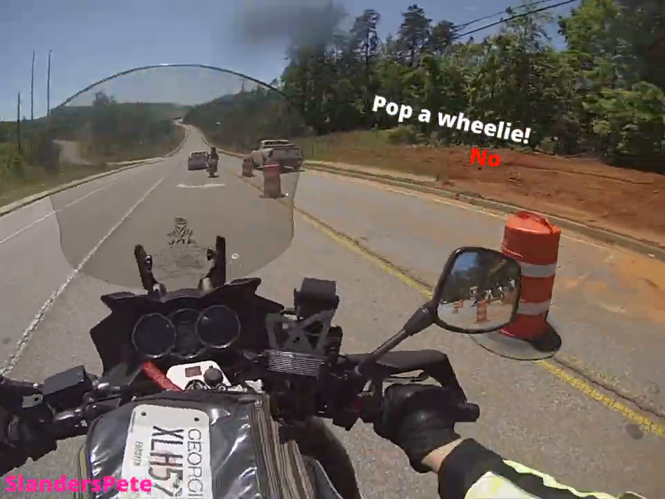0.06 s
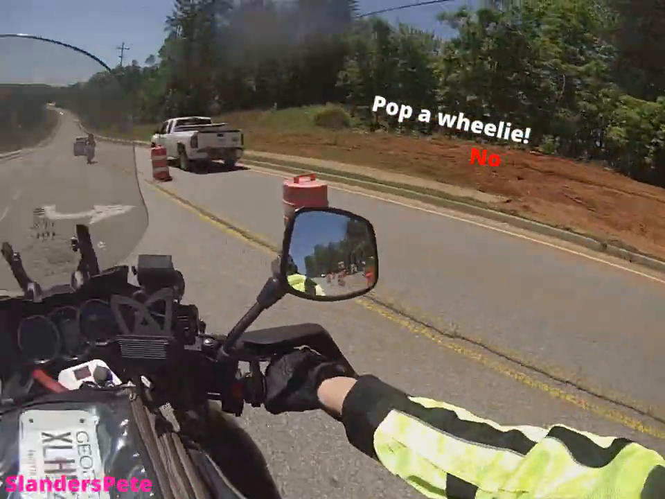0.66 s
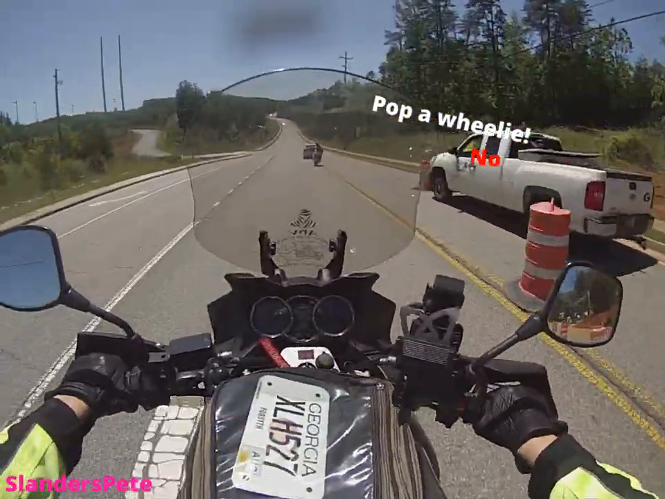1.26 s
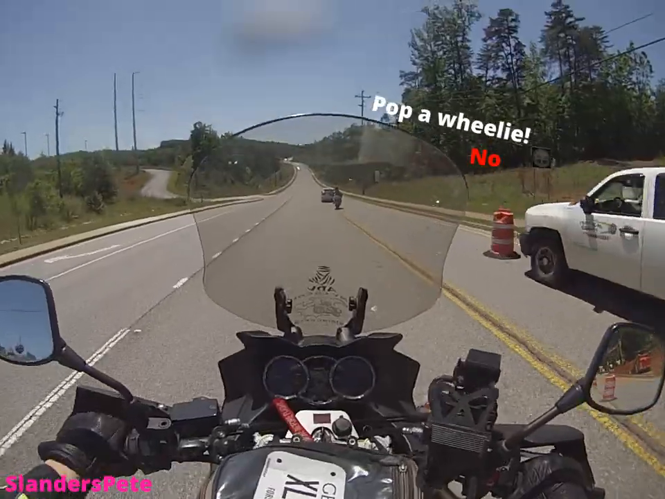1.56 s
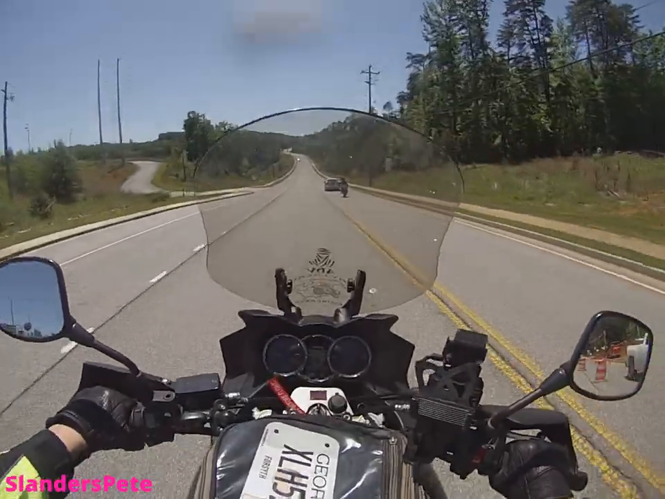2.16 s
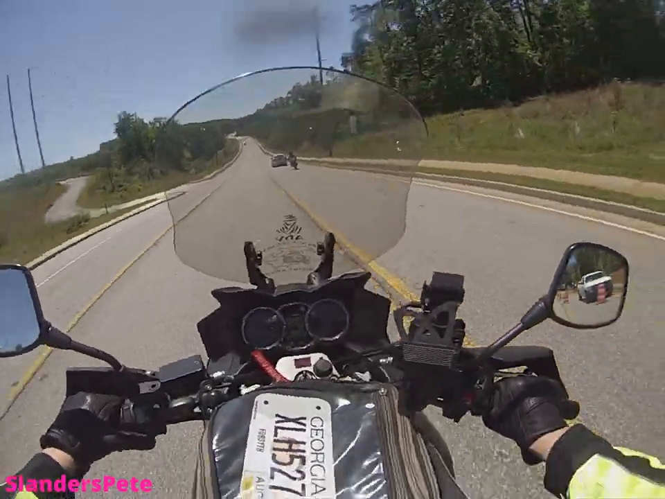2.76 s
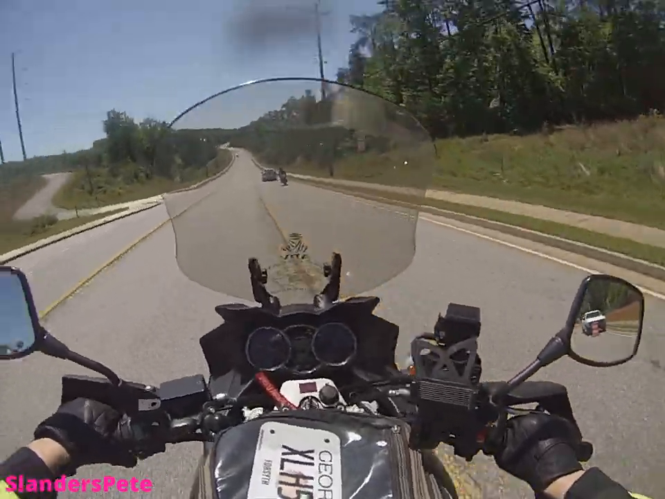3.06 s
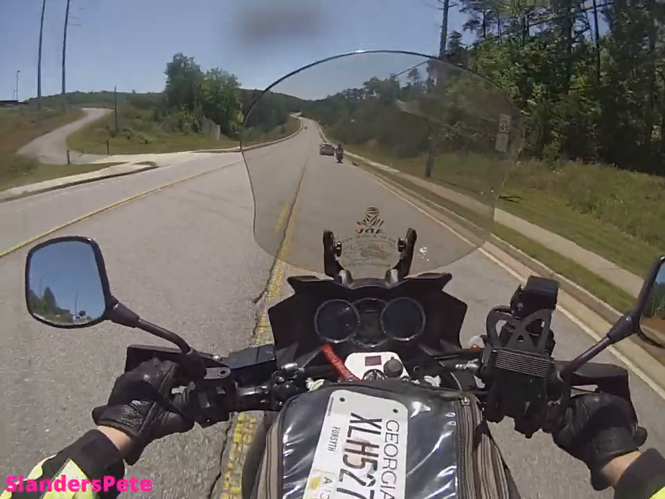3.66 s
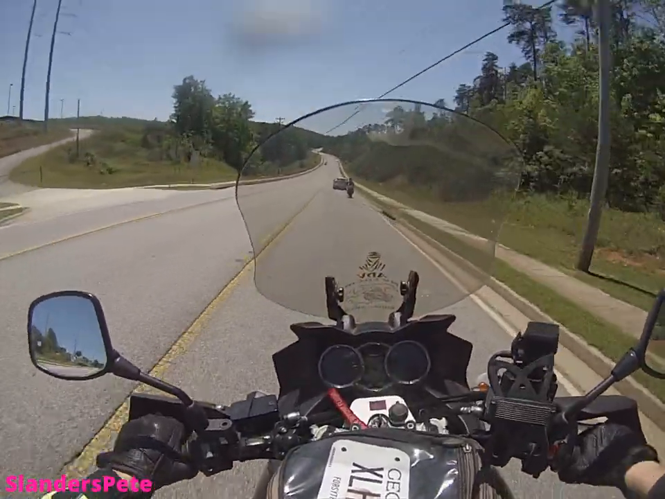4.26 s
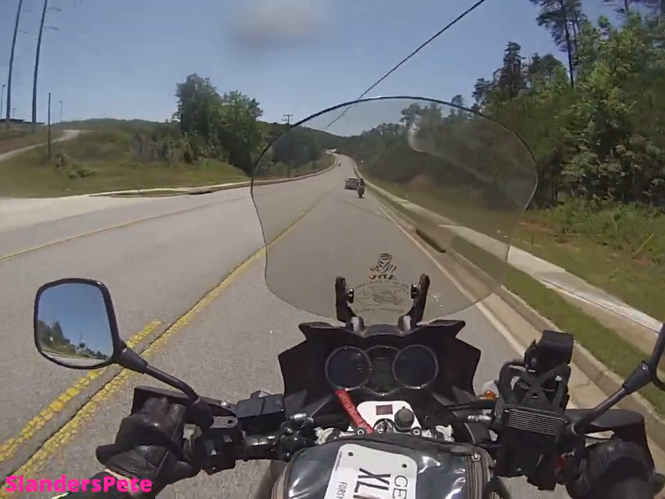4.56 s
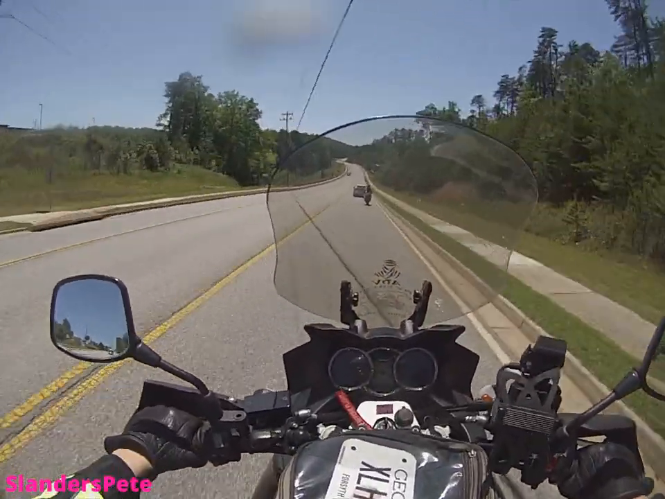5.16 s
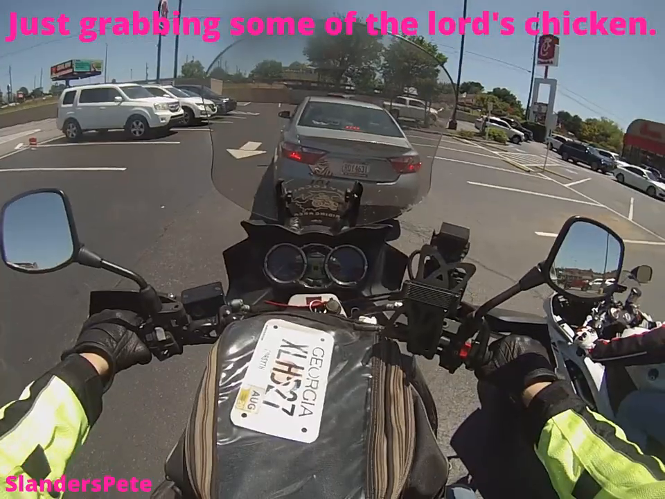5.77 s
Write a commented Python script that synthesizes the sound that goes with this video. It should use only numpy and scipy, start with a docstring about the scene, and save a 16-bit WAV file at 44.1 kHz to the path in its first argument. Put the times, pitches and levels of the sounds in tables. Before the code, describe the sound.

A twin-cylinder motorcycle rides along an open road, heard from the rider's helmet, with wind rumbling and slapping at the microphone over a low hum. Three quick pulls on the throttle raise the revs, which fall for a gear change. The engine then climbs steadily with faint gear whine and eases off again. Near the end the sound cuts to the same bike idling in a car park, throbbing and ticking.

```python
"""On the open road, microphone at the rider's helmet, a twin-cylinder motorcycle just below it. Wind buffets
the microphone over a low hum. Three short pulls on the throttle, the revs fall for a gear change, then the
machine pulls away in a higher gear: firings ring the pipe, air rasps in the airbox, gears whine and the valve
gear rattles. After 5.4 s the scene jumps to a car park, where an idle throbs lumpily, with ticking tappets."""
import sys
import numpy as np
from scipy import signal
from scipy.fft import rfft, irfft, next_fast_len
from scipy.io import wavfile

SR = 44100
rng = np.random.default_rng(int(sys.argv[2]) if len(sys.argv) > 2 else 0)


def store_wav(level_fs):
    """Save 16-bit WAV to argv[1]."""
    pcm = np.round(np.clip(np.atleast_2d(level_fs), -1, 1) * 32767)
    wavfile.write(sys.argv[1], SR, pcm.T.astype(np.int16))


N = 261027
T = np.arange(N) / SR
CAR_PARK_S = 5.402


def undb(db):
    """Decibels to gain."""
    return 10 ** (np.asarray(db) / 20)


def unit(x):
    """Scale to rms 1."""
    return x / np.sqrt(np.mean(x ** 2))


def curves(table):
    """The columns of a table, joined by straight lines in time."""
    times, *columns = np.transpose(table)
    return [np.interp(T, times, column) for column in columns]


def noise():
    """White noise."""
    return rng.standard_normal(N)


def walk(rate):
    """Smooth random drift of rms 1 that changes about rate times a second."""
    hz = np.arange(N // 2 + 1) * SR / N
    return unit(irfft(rfft(noise()) / (1 + (hz / rate) ** 4), N))


def colour(x, points):
    """Causal filter with a (Hz, dB) response that falls away above its last point; output at rms 1."""
    hz, db = np.transpose(points)
    size = next_fast_len(N + SR // 2, True)
    f = np.maximum(np.arange(size // 2 + 1) * SR / size, 1)
    gain = undb(np.interp(np.log(f), np.log(hz), db)) / np.maximum(f / hz[-1], 1) ** 4
    cepstrum = irfft(np.log(gain), size)
    cepstrum[1:size // 2] *= 2  # fold for minimum phase
    cepstrum[size // 2 + 1:] = 0
    return unit(irfft(rfft(x, size) * np.exp(rfft(cepstrum, size)), size)[:N])


def ring(x, hz, width):
    """One resonance, gain 1 at its centre."""
    return signal.lfilter(*signal.iirpeak(hz, hz / width, SR), x)


def band(x, hz, width):
    """The same resonance twice over; output at rms 1."""
    return unit(ring(ring(x, hz, width), hz, width))


def swell(at, half):
    """A bell-shaped rise and fall around a moment."""
    return np.exp(-((T - at) / half) ** 2 / 2)


def tone(turns, rough):
    """A sine locked to a rotation, wavering in strength."""
    return np.sqrt(2) * np.sin(2 * np.pi * turns) * (1 + rough * walk(21))


def strokes(turns, scatter_db):
    """One pulse of uneven strength at each whole turn."""
    return np.diff(np.floor(turns), prepend=np.floor(turns[0])) * undb(scatter_db * noise())


def puffs(turns, decay, depth):
    """An envelope that jumps at each whole turn and dies back; decay is in turns."""
    return unit(1 + depth * np.exp(-(turns % 1) / decay))


# Faint ticks during the ride: (time [s], level [dB])
TREBLE_TICKS = [(1.994, -49), (2.134, -42), (2.363, -48), (2.497, -47), (2.674, -45), (2.925, -46),
                (3.572, -46)]


def ticks():
    """Small sharp ticks high in the treble."""
    bursts = sum(undb(db) * (T >= at) * np.exp(-np.abs(T - at) / .002) for at, db in TREBLE_TICKS)
    return bursts * band(noise(), hz=11800, width=3500)


# Small sounds in both places: (time [s], centre [Hz], width [Hz], half length [s], level [dB])
SQUEAK_BANDS = [(0.03, 2290, 200, 0.082, -40), (0.656, 4270, 2200, 0.44, -45.5),
                (1.03, 3103, 129.9, 0.065, -45.5), (1.39, 3566, 600, 0.0082, -42),
                (1.681, 1720, 110, 0.091, -44.5), (1.995, 2310, 130, 0.14, -42.5),
                (4.381, 7440, 110, 0.0093, -41), (4.632, 7200, 600, .005, -51),
                (4.78, 5020, 3000, .018, -40), (5.654, 8000, 300, 0.0061, -58),
                (5.655, 5500, 3000, .009, -46)]


def squeaks():
    """Brief thin rings, squeaks and rustles."""
    return sum(undb(db) * swell(at, half) * band(noise(), hz, width)
               for at, hz, width, half, db in SQUEAK_BANDS)


# A low hum on the road, heard at the helmet: (time [s], pitch [Hz], level [dB])
LOW_HUM = [(0, 203, -16), (.15, 212, -17), (.35, 211, -30), (.5, 209.2, -20), (.75, 221, -19.5),
           (1.05, 232.4, -21.5), (1.5, 243, -21), (1.85, 250.2, -28), (2.35, 260.8, -33), (2.7, 270, -25),
           (4.3, 232, -38), (4.5, 230, -28), (5, 233, -26.5), (5.35, 258, -27)]


def hum():
    """A wavering low hum, from tyres or wind, climbs slowly, fades, then returns lower and climbs again."""
    hz, db = curves(LOW_HUM)
    cycles = np.cumsum(hz + 2 * walk(12.2)) / SR
    octave = undb(-11) * tone(2 * cycles, rough=.5)
    return undb(db) * (tone(cycles, rough=.22) + octave)


# Air stream at the helmet, relative levels: (time [s], rumble [dB], buffeting [dB], hiss [dB])
AIR_STREAM = [(0, -15, -21.5, -40), (.45, -25, -22, -43.5), (.62, -25, -20, -42.5), (.75, -30, -24.5, -41),
              (1.05, -29, -24.5, -46), (1.2, -21, -25, -51), (1.68, -20, -24, -46.5),
              (1.9, -17, -19.5, -41.5), (2.25, -18.5, -16, -40), (2.33, -13.5, -20.5, -47),
              (2.5, -21, -22.5, -44.5), (2.8, -24, -19, -42.5), (3.35, -15, -16.5, -42.5),
              (3.9, -18.5, -20.5, -43), (4.2, -21.5, -18.5, -41), (4.6, -17, -20, -44.5),
              (4.9, -16, -18, -42), (5.4, -21, -19.5, -43)]
# Single slaps right on the microphone: (time [s], half length [s], buffeting [dB], rumble [dB])
WIND_SLAPS = [(.065, 0.01, -14, -13), (0.157, 0.02, -18, -20), (0.537, 0.01, -21, -18),
              (1.188, 0.046, -23.5, -17.5), (1.447, 0.064, -21, -15), (1.791, 0.0076, -21, -11),
              (1.84, 0.014, -16, -13), (1.906, 0.0073, -15.5, -12), (1.983, 0.011, -14.5, -11.5),
              (2.088, 0.016, -16, -9), (2.292, 0.014, -12, -6.5), (2.362, .01, -22, -9),
              (2.493, .008, -21, -13), (3.547, 0.057, -19, -16.5), (4.221, 0.018, -14.5, -15),
              (5.12, 0.014, -12.5, -26), (5.151, 0.0095, -33, -13.5), (5.261, 0.0065, -16, -16),
              (5.376, 0.023, -16, -18)]
# Spectra of the three wind layers: (frequency [Hz], gain [dB])
RUMBLE_SPECTRUM = [(12, -5), (25, -2), (45, -1), (85, -4.5), (130, -3.5), (190, -10), (280, -13.5),
                   (500, -56)]
BUFFET_SPECTRUM = [(90, -21.5), (170, 0.5), (250, 2.5), (320, 0), (400, 1.5), (480, -1), (620, -1.5),
                   (750, -6), (880, -11.5), (1050, -20), (1400, -29), (2500, -62.5)]
HISS_SPECTRUM = [(900, 0.5), (1500, 7.5), (3200, 7), (4300, -0.5), (5200, 2), (5700, 0.5), (6400, 3),
                 (7100, -6.5), (7700, -5.5), (8500, -12.5), (10500, -16.5), (13000, -22)]


def wind():
    """Eddies slap the microphone in quick gusts above a low rumble; air hisses, more under throttle."""
    rumble_db, buffet_db, hiss_db = curves(AIR_STREAM)
    load, _ = throttle()
    eddies, gusts_db = walk(39), 1.03 * walk(17)
    slaps = sum(undb(db) * swell(at, half) for at, half, db, _ in WIND_SLAPS)
    thumps = sum(undb(db) * swell(at, half) for at, half, _, db in WIND_SLAPS)
    rumble = np.hypot(undb(rumble_db + gusts_db - .5), thumps) * colour(noise(), RUMBLE_SPECTRUM)
    turbulence = unit(colour(noise(), BUFFET_SPECTRUM) * undb(.56 * eddies))
    buffet = np.hypot(undb(buffet_db + gusts_db), slaps) * turbulence
    hiss = undb(hiss_db + 4.5 + 3.2 * load + .95 * eddies) * colour(noise(), HISS_SPECTRUM)
    return rumble + buffet + hiss


# Idle harmonics in the car park, relative levels: (time [s], first [dB], second [dB], third [dB])
THROB_HARMONICS = [(5.41, -15, -15.5, -20), (5.51, -20, -13, -12.5), (5.555, -22, -28, -31),
                   (5.614, -18, -12.5, -12.5), (5.73, -23, -42, -15.5), (5.765, -19, -11.5, -34),
                   (5.92, -17, -31, -9.5)]
# Spectra of the idle's gas puffs, tappets and thuds: (frequency [Hz], gain [dB])
GAS_SPECTRUM = [(110, -2.5), (190, 2), (270, 1.5), (340, -5.5), (420, -2.5), (520, -5), (610, -6),
                (700, -2), (780, -14), (930, -15), (1100, -30), (1500, -62)]
TAPPET_SPECTRUM = [(800, -16), (1300, -5.5), (1560, -7.5), (1820, 0), (2250, -7.5), (2850, -4), (3600, -10),
                   (4400, -17.5), (5300, -17), (6300, -20.5), (7300, -26.5), (8600, -32.5), (10500, -33),
                   (13000, -43)]
THUD_SPECTRUM = [(20, -41), (60, -24), (140, 19.5), (200, -5.5), (280, -5), (400, -28.5)]
IDLE_HZ, IDLE_SAG_HZ_PER_S = 45, 2.6


def idle():
    """A lumpy throb that slowly sinks, with a thud, a gas puff and tappet noise on every beat."""
    hz = IDLE_HZ - IDLE_SAG_HZ_PER_S * (T - CAR_PARK_S)
    beats = np.cumsum(hz * (T > CAR_PARK_S)) / SR + .6
    # the pipe shifts each harmonic a little more, so a beat swings up and then down
    throb = sum(undb(db - .3) * tone(harmonic * (beats - .2) + .5, rough=.15)
                for harmonic, db in enumerate(curves(THROB_HARMONICS), 1))
    thuds = undb(-29) * colour(strokes(beats, scatter_db=2.5), THUD_SPECTRUM)
    gas = noise() * puffs(beats, decay=.18, depth=1.4) * undb(.8 * walk(5.1))
    body = undb(-24) * colour(gas, GAS_SPECTRUM)
    tappets = undb(-39.5) * colour(noise() * puffs(beats, decay=.22, depth=.55), TAPPET_SPECTRUM)
    return throb + thuds + body + tappets


# Gearbox, heard from the saddle: (order [per crank turn], peak time [s], half length [s], level [dB])
GEAR_WHINES = [(33.2, 3.03, 0.26, -37), (63, 0.68, 0.1, -47), (80.8, 1.24, 0.12, -51),
               (81.3, 2.86, 0.13, -48), (67.5, 4.1, 0.36, -47), (45.7, 4.12, 0.087, -44)]


def gears(turns):
    """Gear whines come and go, their pitch tied to the crank."""
    return sum(undb(db) * swell(at, half) * tone(order * (turns + .0029 * walk(30)), rough=.29)
               for order, at, half, db in GEAR_WHINES)


# Resonances of the engine cases: (centre [Hz], width [Hz], gain [dB])
CASE_MODES = [(1302, 41, 8.5), (1763, 44, 7.5), (2210, 270, 6), (2950, 130, 1), (3850, 59, -0.5)]


def valve_gear(turns, load):
    """The valve gear rattles in the cases twice a turn, harder under load."""
    rattle = noise() * puffs(2 * turns, decay=.11, depth=1.9)
    cases = unit(sum(undb(db) * ring(rattle, hz, width) for hz, width, db in CASE_MODES))
    clatter = signal.sosfilt(signal.butter(2, [1000, 4500], "band", fs=SR, output="sos"), cases)
    return undb(-43) * (1 + .6 * load) * clatter


def intake(turns):
    """Air torn past the throttle plate rings the airbox once a turn."""
    air = noise() * puffs(turns, decay=.18, depth=.91)
    return band(air, hz=756, width=160)


# The rider's pulls on the throttle: (opens [s], closes [s], load [dB], airbox rasp [dB])
THROTTLE_PULLS = [(0.033, 0.195, -10, -29), (0.278, 0.386, -4, -29), (0.508, 0.592, 0.5, -24),
                  (2.605, 4.248, -4.5, -34)]
OPEN_S, CLOSE_S = .031, .027


def throttle():
    """Load on the engine and rasp of the airbox: each pull rises quickly, holds and dies away."""
    load, rasp = 0, 0
    for opens, closes, load_db, rasp_db in THROTTLE_PULLS:
        pull = np.clip((T - opens) / OPEN_S, 0, 1) * np.exp(-np.maximum(T - closes, 0) / CLOSE_S)
        load += undb(load_db) * pull
        rasp += undb(rasp_db) * pull
    return load, rasp


# Resonances of pipe and airbox: (centre [Hz], width [Hz], gain [dB])
DUCT_MODES = [(82, 25, 7.5), (226, 16, 5), (253, 14, 10), (460, 24, 3), (520, 41, 12.5), (685, 60, 3.5)]


def crank_tone(order, speed, shaft):
    """A tone on a multiple of the crank speed swells as it sweeps through each resonance."""
    boost = sum(undb(db) ** 2 / (1 + (2 * (order * speed - centre) / width) ** 2)
                for centre, width, db in DUCT_MODES)
    return np.sqrt(1 + boost) * tone(order * shaft, rough=.18)


# Low boom of the engine: (order [per crank turn], relative level [dB])
BOOM_ORDERS = [(2, -28), (3, -28)]
# Its upper tones, relative levels: (order [per crank turn], coasting [dB], under load [dB])
UPPER_ORDERS = [(4, -35, -53), (5, -42, -21.5), (6, -38, -31.5), (7, -38, -42), (8, -40.5, -45),
                (9, -49, -40), (10, -44.5, -41), (11, -55.5, -38.5), (12, -59, -44), (13, -58, -30.5),
                (14, -50, -46), (15, -54, -38.5), (17, -48.5, -36.5), (18, -48.5, -34), (19, -52, -35.5),
                (20, -55, -38.5)]
# How strongly both reach the helmet: (time [s], boom gain [dB], upper gain [dB])
TONES_AT_HELMET = [(0, 0, -6), (.12, 3, 5.5), (.4, 0, 1), (.56, -3, -8), (.72, -1, 3), (1, -2, 1),
                   (1.35, 4.5, -5), (1.65, -3.5, -1), (2, -1.5, 5.5), (2.45, -6.5, -6), (2.9, 3.5, -1),
                   (3.5, -4.5, -0.5), (4.15, -2, -2), (4.58, 0.5, 5.5), (4.9, -8, 2), (5.4, -6, 0.5)]


def drone(speed, turns, load):
    """Low crank orders boom; the upper ones change their balance with the load."""
    shaft = turns + .0023 * walk(35)  # play in the gears blurs the high orders most
    boom_db, upper_db = curves(TONES_AT_HELMET)
    boom = sum(undb(db) * crank_tone(order, speed, shaft) for order, db in BOOM_ORDERS)
    upper = sum(np.hypot(undb(coast_db), undb(load_db) * load) * crank_tone(order, speed, shaft)
                for order, coast_db, load_db in UPPER_ORDERS)
    return undb(boom_db) * boom + undb(upper_db) * upper


# The firings as they reach the helmet through airbox and pipe: (frequency [Hz], gain [dB])
PIPE_SPECTRUM = [(40, -30), (100, -30), (160, -1), (250, -4.5), (320, -11.5), (420, 5), (520, 5), (620, 2),
                 (740, -1), (850, -19), (1000, -22.5), (1200, -41), (2500, -60.5)]
PULL_DB, COAST_DB, CRUISE_HZ = -22, -30, 42.5


def exhaust(speed, turns, load):
    """Each cylinder fires into the pipe every second turn; weaker pulses come with every piston stroke."""
    firings = strokes(turns / 2, scatter_db=2.5) + strokes((turns + 1) / 2, scatter_db=3.5)
    pulses = firings + .53 * strokes(2 * turns + .3, scatter_db=.5)
    # pressure waves run to and fro in the pipe, so each pulse is drawn out
    for hz, width in [(250, 16.3), (440, 34.4), (560, 50), (700, 225)]:
        pulses = pulses - 2 * ring(pulses, hz, width)
    coasting = undb(COAST_DB) * (speed / CRUISE_HZ) ** 1.4
    return np.hypot(undb(PULL_DB) * load, coasting) * colour(pulses, PIPE_SPECTRUM)


# Revs along the road: (time [s], crank speed [turns/s])
CRANK_SPEED = [(0, 31), (.2, 40), (.3, 40.5), (.42, 51.3), (.52, 50), (.62, 55.2), (.72, 53.9), (.85, 46.9),
               (1.3, 27.5), (1.45, 23.4), (1.8, 30), (2.15, 30), (2.6, 34), (3.2, 39.4), (3.55, 42.2),
               (4.27, 47), (4.42, 44.3), (4.7, 33.4), (4.9, 28.3), (5.4, 31.6)]


def engine():
    """The twin just below the rider: one crank times the exhaust, drone, gears, valves and intake."""
    speed, = curves(CRANK_SPEED)
    turns = np.cumsum(speed) / SR
    load, rasp = throttle()
    roar = exhaust(speed, turns, load) + drone(speed, turns, load)
    machinery = gears(turns) + valve_gear(turns, load)
    return roar + machinery + rasp * intake(turns)


def scene():
    """The road gives way at once to the car park, in mono."""
    parked = np.clip((T - CAR_PARK_S) / .0018, 0, 1)
    ride = engine() + hum() + wind() + ticks()
    mix = (1 - parked) * ride + parked * idle() + squeaks()
    fade_out = np.clip((T[-1] - T) / .004, 0, 1)
    return (fade_out * mix)[None]


def record(dry):
    """The helmet camera rounds the highest peaks and cuts the top."""
    ceiling, top_hz = .9, 13150
    rounded = dry / (1 + (dry / ceiling) ** 6) ** (1 / 6)
    return signal.sosfilt(signal.ellip(10, .2, 80, top_hz, fs=SR, output="sos"), rounded)


dry = scene()
out = record(dry)
store_wav(out)
```